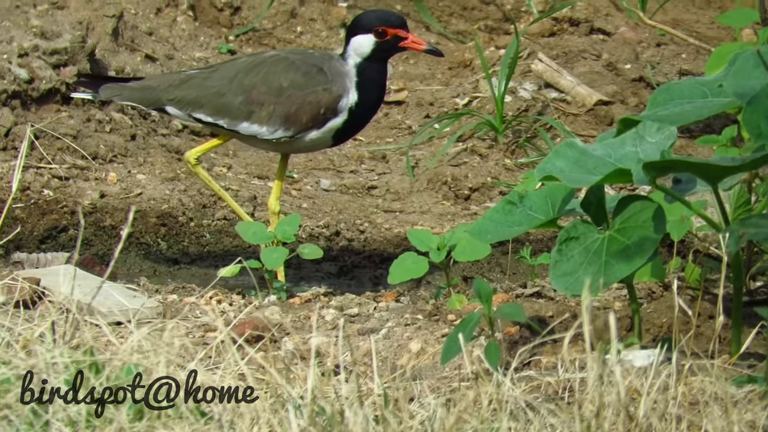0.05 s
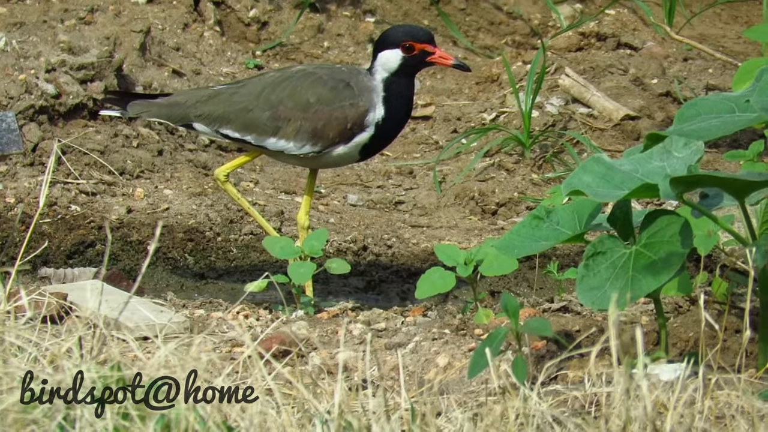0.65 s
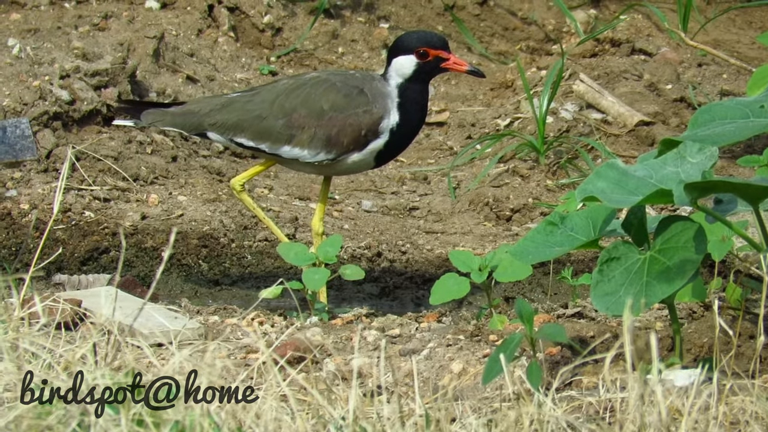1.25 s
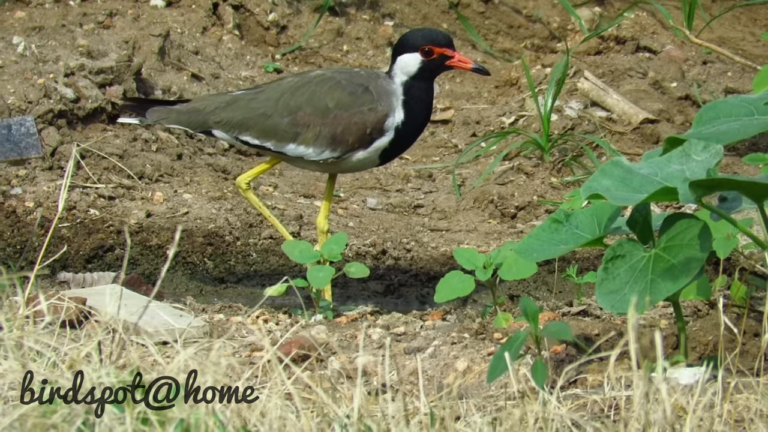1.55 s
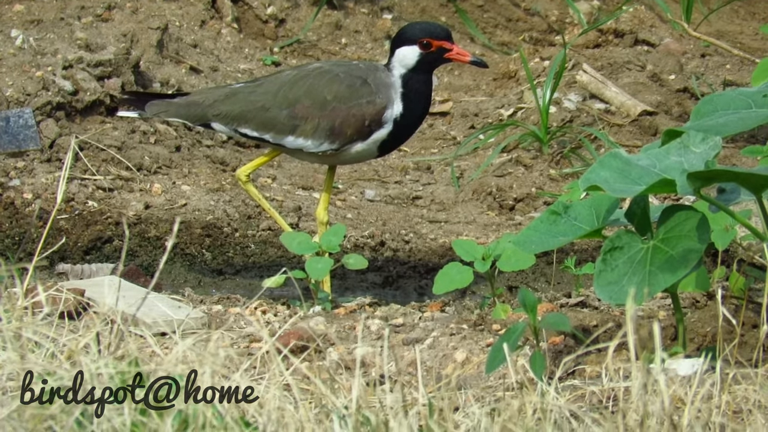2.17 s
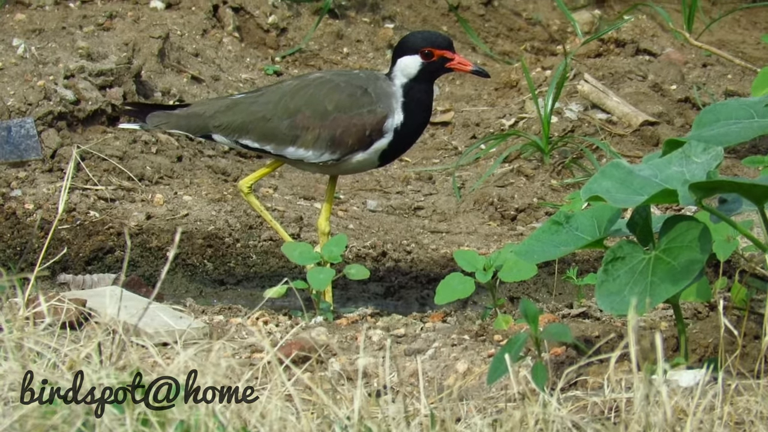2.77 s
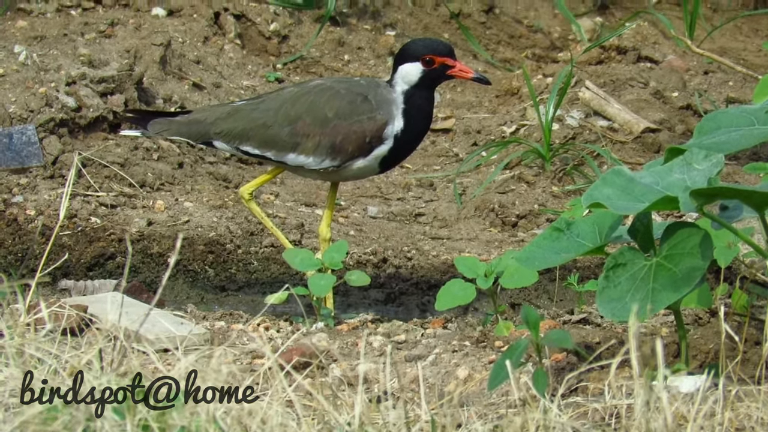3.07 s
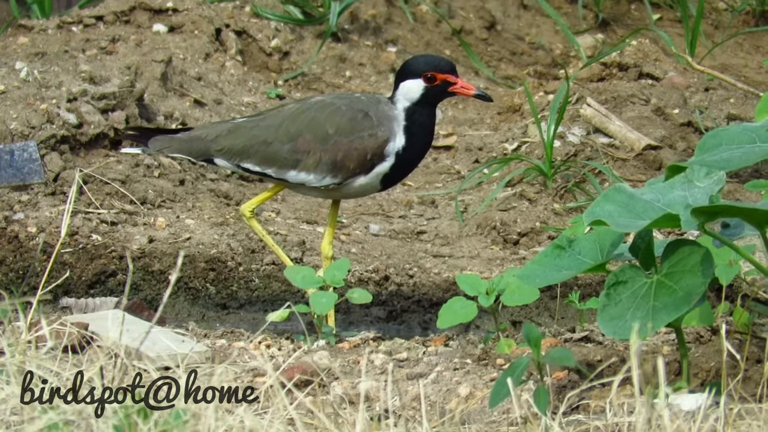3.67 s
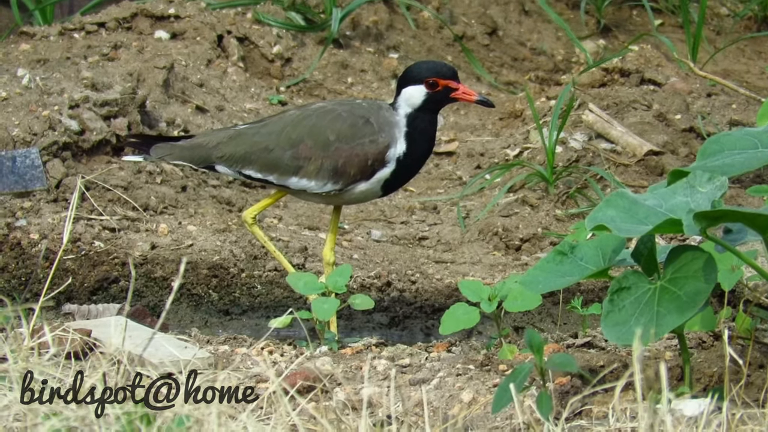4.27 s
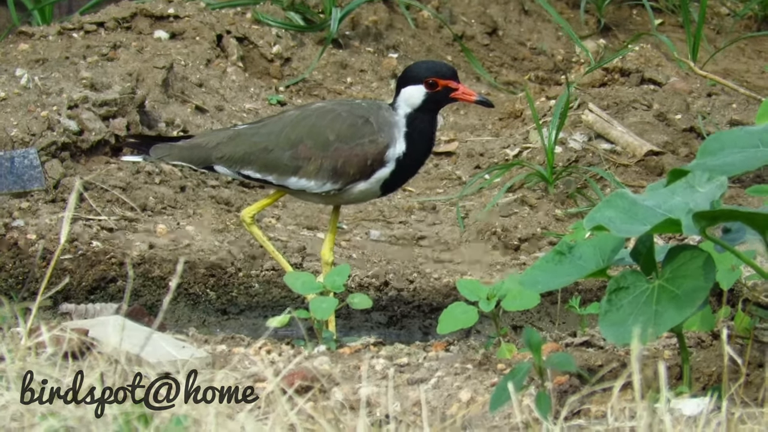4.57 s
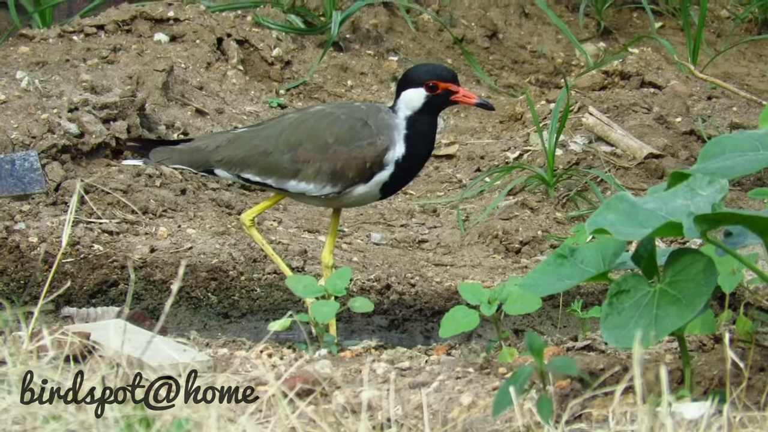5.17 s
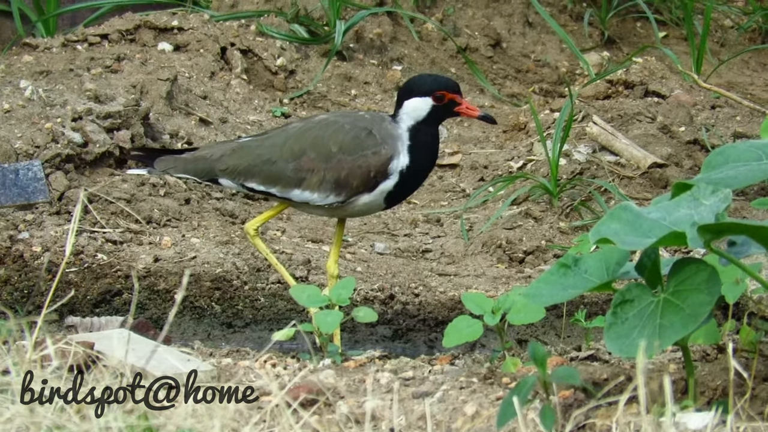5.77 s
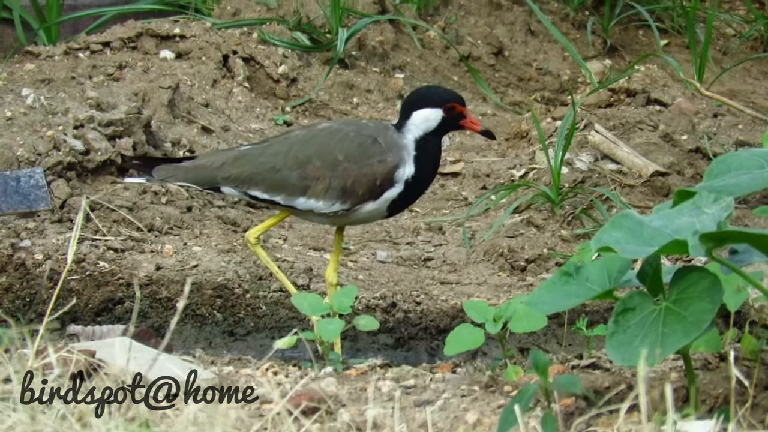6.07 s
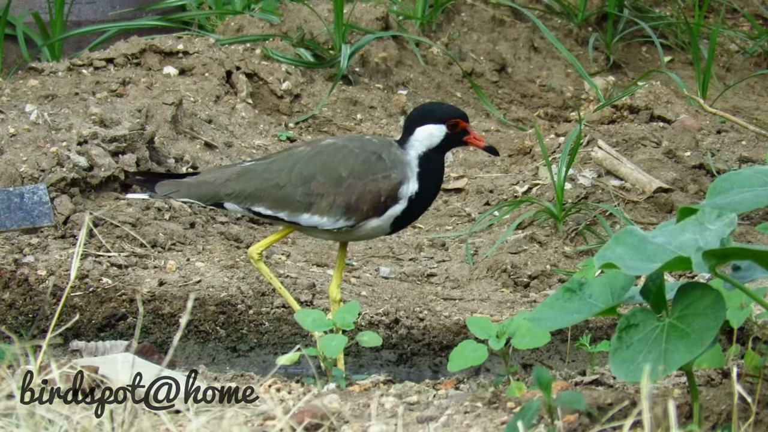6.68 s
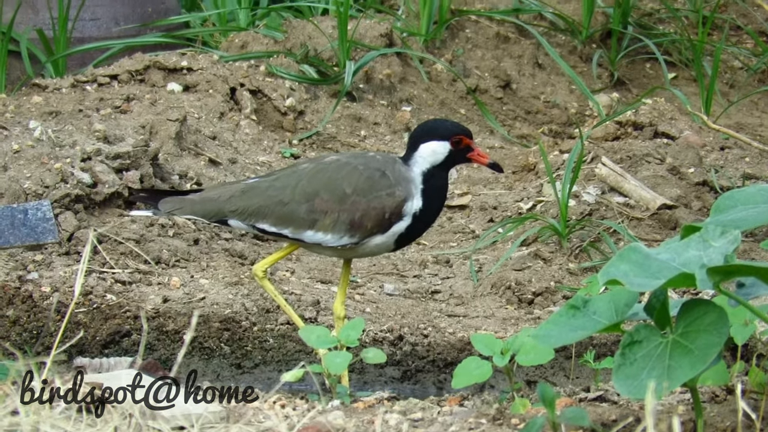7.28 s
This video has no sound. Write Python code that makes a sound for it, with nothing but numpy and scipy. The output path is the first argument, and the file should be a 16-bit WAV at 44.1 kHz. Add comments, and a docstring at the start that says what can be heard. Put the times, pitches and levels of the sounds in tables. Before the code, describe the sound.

A lapwing on open muddy ground gives two bursts of shrill, squeaky calls in the first two seconds, some notes stuttering and flipping upward. Crickets chirp in quick bouts throughout, over a high, shimmering insect chorus. Midway a small bird whistles a short falling phrase and distant crows caw three times, then faint piping notes follow. One microphone catches it all, with a thin echo, a low rumble and soft hiss.

```python
"""A lapwing on open mud gives two bursts of squeaky calls: its voice box chops most notes into a stutter
before they hold, and some dip and flip upward. Crickets chirp in bouts, two wing strokes a chirp, over
a far insect chorus. Crows caw far off with rattling voices, and small birds whistle and chip.
Trees give a thin echo; a low rumble, a soft hiss and, early on, a far engine lie underneath.
One microphone hears it all."""
import sys
import numpy as np
from scipy import signal
from scipy.fft import rfft, irfft, next_fast_len
from scipy.io import wavfile
from scipy.ndimage import uniform_filter1d, map_coordinates

SR = 44100
rng = np.random.default_rng(int(sys.argv[2]) if len(sys.argv) > 2 else 0)


def log_audio(samples):
    """Write samples as a 16-bit WAV file to the path given in sys.argv[1]."""
    # one column per channel
    frames = np.atleast_2d(samples).T
    # limit to full scale, then quantise
    limited = np.clip(frames, -1, 1)
    pcm = np.round(limited * 32767).astype(np.int16)
    wavfile.write(sys.argv[1], SR, pcm)


N = 323253
TIME = np.arange(N) / SR

# Bouts (runs) of cricket chirps. Each row: first chirp in seconds, last chirp in seconds,
# slowing in seconds per chirp squared, base level in dB.
BOUTS = [(.011, .109, 0, -31.5), (.597, .866, .001, -32.5), (.933, 1.223, .0028, -31),
         (1.697, 2.441, .0007, -30.5), (2.914, 3.694, .0008, -32.5), (3.946, 4.632, .0015, -31.5),
         (5.059, 5.337, .002, -32), (5.453, 5.91, .0018, -31.5), (6.178, 6.865, .0022, -31.5)]


def lapwing(stutter_db=0.9, thump_db=-34, rasp_db=-48, echo_db=-27, echo_s=0.1):
    """Squeaks chopped by the bird's voice box, with a rasp and a pop in each burst and a faint echo."""
    stuttering, bursts, thumps = lapwing_stutter()
    gate = 1 - stuttering + stuttering * from_db(stutter_db) * bursts
    voice = lapwing_voice(stuttering)
    rasp_colour = [(300, 9), (1200, 25), (2500, 5), (3800, 15), (6000, -15), (15000, -19)]
    call = voice * gate + from_db(rasp_db) * bursts * noise(rasp_colour)
    echo = from_db(echo_db) * np.interp(TIME - echo_s, TIME, call, left=0)
    return outdoors(call + echo, wet_db=-21.5, t60=0.14) + from_db(thump_db) * thumps


def lapwing_stutter(first_burst_s=0.0058, growth_s=0.0008, shut_s=0.0017, thump_s=0.00058):
    """The voice box opens in quick bursts, each longer than the last and each starting with a dull pop."""
    # Each row: start in seconds, seconds between bursts, time in seconds from which the voice holds.
    stutters = [(.243, .0131, .322), (1.0494, .015, 1.0807), (1.172, .0139, 1.258), (1.521, .0131, 1.6006)]
    stuttering, bursts, thumps = np.zeros((3, N))
    t = np.arange(SR // 30) / SR
    for start, period, holds in stutters:
        stuttering[(TIME > start - period / 2) & (TIME < holds)] = 1
        for k in range(round((holds - start) / period)):
            opens, open_s = start + k * period, first_burst_s + k * growth_s
            rise = 1 - np.exp(-t / 0.0001)
            add(bursts, opens, rise * np.exp(-np.maximum(t - open_s, 0) / shut_s))
            age = t / (thump_s * rng.uniform(0.38, 2.0))
            add(thumps, opens + rng.uniform(0, 0.0021), age * (3 - age) * np.exp(-age))
    return uniform_filter1d(stuttering, size=60), bursts, thumps


def lapwing_voice(stuttering, jitter=0.0019, rough_jitter=0.034, rough_db=2.0):
    """A pressed voice, rich in overtones, rings in the throat; roughness shakes its pitch and level."""
    # How the throat colours the voice. Each row: frequency in Hz, gain in dB.
    throat = [(1000, -25), (1230, -19), (1550, -10.5), (2000, -4.5), (2450, -3), (3100, -9), (3700, -12.7),
              (4850, -19.5), (6100, -30), (7300, -32), (8600, -41), (9900, -41), (11200, -36),
              (12500, -32.5), (14000, -33.5), (15500, -38)]
    # The squeaks, one list a note. Each row: time in seconds, pitch in Hz.
    squeaks = [
        [(0, 1225), (.07, 1205), (.115, 1202), (.131, 1132)],
        [(.243, 1148), (.258, 1182), (.285, 1229), (.322, 1160), (.345, 1100), (.358, 1023), (.376, 966)],
        [(1.05, 1199), (1.068, 1203), (1.09, 1245), (1.102, 1140)],
        [(1.172, 1207), (1.2, 1251), (1.245, 1262), (1.325, 1249), (1.407, 1212), (1.419, 1130)],
        [(1.521, 1184), (1.545, 1229), (1.603, 1194), (1.624, 1113), (1.64, 1040), (1.655, 980)],
    ]
    # The upward flips after a deep slide, laid out like the squeaks.
    flips = [
        [(.379, 1226), (.395, 1303), (.408, 1427), (.419, 1643), (.436, 1466)],
        [(1.657, 1275), (1.672, 1280), (1.69, 1364), (1.703, 1650), (1.722, 1530)],
    ]
    # Pitch sets a squeak's tone. Each row: pitch in Hz, level in dB before the throat,
    # overtone brightness in dB per octave, roughness (0 is smooth).
    squeak_tone = [(1030, -38, -3, .03), (1100, -32.3, -4.5, 0.45), (1235, -31.5, -0.4, 0.05),
                   (1310, -30.7, -0.5, .03)]
    # The same columns for the flips, where the voice breaks at the top.
    flip_tone = [(1230, -36, -15, .4), (1320, -32.5, -10, .08), (1420, -28.5, -4, 0.29),
                 (1530, -31, -2.5, 0.51), (1585, -34.5, -3.5, 1.6)]
    notes = [lapwing_note(pitches, squeak_tone) for pitches in squeaks]
    notes += [lapwing_note(pitches, flip_tone) for pitches in flips]
    out = np.zeros(N)
    for t, hz, gain, bright_db, rough in notes:
        strain = np.interp(t, TIME, stuttering)   # stuttering makes the voice brighter and rougher
        bright_db, rough = bright_db + 0.2 * strain, rough + 0.51 * strain
        hz = hz * (1 + (jitter + rough_jitter * rough) * drift(906, len(hz)))
        phase = cycle(hz)
        voice = np.zeros(len(hz))
        for k in range(1, 14):
            tilt = from_db(bright_db * np.log2(max(k, 2) - 1))
            voice += gain_at(throat, k * hz) * (k * hz < SR / 2) * tilt * np.sin(k * phase)
        shake = from_db((0.1 + rough_db * rough) * drift(669, len(hz)))
        add(out, t[0], gain * voice * shake)
    return out


def lapwing_note(pitches, tone, release_s=0.0069, release_db=11):
    """Times, pitch, gain, brightness and roughness along one note, which fades as it ends."""
    hz, gain = contour([(s, hz, 0) for s, hz in pitches])
    t = pitches[0][0] + np.arange(len(hz)) / SR
    at_hz, *columns = np.transpose(tone)
    db, bright_db, rough = (np.interp(hz, at_hz, column) for column in columns)
    release = np.clip(1 - (t[-1] - t) / release_s, 0, 1)
    return t, hz, gain * from_db(db - release_db * release), bright_db, rough


def near_crickets(pitch_hz=5552, width_s=0.004, stroke_gap_s=0.0225, overtone_db=-36):
    """Two wing strokes a chirp; each swells and fades on the one pitch at which the wing rings."""
    out = np.zeros(N)
    t = np.arange(-SR // 80, SR // 80) / SR
    swell = np.exp(-0.5 * (t / width_s) ** 2)
    for s, db in chirps():
        for at in (s, s + stroke_gap_s):
            hz = pitch_hz + rng.normal(0, 15.8) - 1500 * t   # sinks a little during the stroke
            phase = cycle(hz) + rng.uniform(0, 2 * np.pi)
            stroke = np.sin(phase) + from_db(overtone_db) * np.sin(2 * phase)
            add(out, at + t[0], from_db(db + rng.normal(-0.5, 1.4)) * swell * stroke)
    return outdoors(out, wet_db=-11.5, t60=0.15)


def chirps(spacing_s=0.095, swell_db=3, strays_per_s=2.2, stray_db=-3.5):
    """Time and level of every chirp: a bout slows down as it goes and is loudest in the middle."""
    for first, last, slowing, db in BOUTS:
        steps = max(round((last - first) / spacing_s), 1)
        for k in range(steps + 1):
            s = first + (last - first) * k / steps - slowing * k * (steps - k)
            swell = np.sin(np.pi * (k + 1) / (steps + 2)) - 1
            yield s, db + swell_db * swell
            chance, offset = rng.random(2)
            if chance < strays_per_s * spacing_s and k < steps:   # a neighbour chirps in between
                yield s + spacing_s * (1 + offset) / 3, db + stray_db


def far_crickets(level_db=-48.5, flicker_db=3, early_s=0.1, late_s=0.12, fade_s=0.04):
    """A blur of farther crickets that joins just before each near bout and stops just after it."""
    # Their colour. Each row: frequency in Hz, gain in dB.
    colour = [(4900, -33.5), (5350, -13), (5540, 3), (5680, -14), (6000, -30), (10300, -55), (10900, -32),
              (11150, -29), (11600, -54)]
    inside_s = [np.minimum(TIME - first + early_s, last + late_s - TIME) for first, last, *_ in BOUTS]
    joined = np.clip(np.max(inside_s, axis=0) / fade_s + 0.5, 0, 1)
    return joined * from_db(level_db + flicker_db * drift(80)) * noise(colour)


def crows(rough=0.77, jitter=0.018, rattle_hz=130, flutter=0.0708, fundamental_db=2):
    """Harsh caws that swell, arch and fall: an uneven rattle throws side tones around each overtone."""
    # Each row: start in seconds, length in seconds, top pitch in Hz, base level in dB,
    # beak opening in dB (higher gives stronger overtones).
    caws = [(-.05, 0.22, 771, -66, -48), (0.66, 0.19, 763, -68.5, -52), (1.267, 0.25, 754, -66, -25),
            (1.842, 0.34, 827, -62, -20), (2.449, 0.43, 742, -68, -33), (3.863, 0.37, 690.7, -48, -4.5),
            (4.45, 0.37, 667.3, -50.5, -2.5), (5.289, .39, 677, -47, -5),
            (7.087, 0.26, 683.5, -58.5, -19.5)]
    # How the throat colours a caw. Each row: frequency in Hz, gain in dB.
    throat = [(350, 5), (620, -18), (900, -20), (1100, -15.5), (1330, 2.5), (1600, 4), (1950, -5.5),
              (2250, -17), (3500, -47), (6000, -50)]
    # A caw's shape. Each row: share of its length, share of its top pitch, level change in dB.
    arch = [(0, .9, -22), (.1674, .98, -3), (.42, 1, 1), (.65, .92, -1), (.85, .81, -4), (1, .72, -9)]
    out = np.zeros(N)
    for s, length, pitch, db, beak_db in caws:
        hz, gain = contour([(s + part * length, bend * pitch, change) for part, bend, change in arch])
        size = len(hz)
        phase = cycle(hz * (1 + jitter * drift(500, size)))
        rattle_phase = cycle(rattle_hz * (1 + 0.21 * drift(60.7, size)))
        rattle = 1 + rough * (np.sqrt(2) * np.sin(rattle_phase) + drift(700, size))
        # the lowest tone flutters and is strongest in mid-call
        swell = from_db(fundamental_db) * np.sin(np.linspace(0, np.pi, size))
        fundamental = swell * np.sin(cycle(hz * (0.97 + flutter * drift(199.6, size))))
        overtones = sum(np.sin(k * phase) for k in range(2, 7))
        voice = rattle * from_db(beak_db) * overtones + fundamental
        caw = irfft(rfft(voice) * gain_at(throat, np.arange(size // 2 + 1) * SR / size), size)
        add(out, s, from_db(db) * gain * rms_one(caw))
    return outdoors(outdoors(out, wet_db=-6, t60=0.26), wet_db=-13.5, t60=2.63)


def songbirds():
    """One bird whistles nearby; farther ones pipe, chip and whistle, and one hoots once."""
    # The near whistler, one list a note. Each row: time in seconds, pitch in Hz, base level in dB.
    whistles = [
        [(3.615, 6050, -52), (3.655, 6050, -40.5), (3.7, 5450, -34.5), (3.745, 4610, -36), (3.785, 3820, -40),
         (3.8, 3400, -59)],
        [(3.885, 6400, -47), (3.905, 5100, -35.5), (3.92, 4350, -43), (3.938, 3990, -39)],
        [(3.94, 3350, -49), (3.953, 4150, -40.5), (3.97, 4380, -38), (3.987, 3750, -48)],
        [(4.012, 3280, -49), (4.027, 4040, -41), (4.04, 4160, -35.5), (4.05, 3870, -66)],
        [(4.125, 4700, -40), (4.15, 5600, -35), (4.168, 5890, -36), (4.195, 5250, -37), (4.225, 4070, -38.5),
         (4.255, 3440, -44), (4.28, 2970, -56)],
    ]
    # A piping bird. Each row: start in seconds, length in seconds, pitch in Hz, base level in dB.
    pip_notes = [(6.059, 0.042, 2794, -48), (6.349, 0.059, 2756, -47), (6.645, 0.059, 2763, -45.5),
                 (6.924, 0.088, 2793, -46), (7.197, 0.046, 2734, -45)]
    # Faint whistles that sink a little. Each row: start in seconds, length in seconds, base level in dB.
    faint_notes = [(-.05, 0.258, -44.5), (3.377, 0.297, -61)]
    # One far hoot. Each row: time in seconds, pitch in Hz, level in dB.
    hoot_note = [(2.57, 544, -68), (2.595, 575, -49), (2.615, 563, -51), (2.645, 548, -57)]
    # Runs of rising notes, falling slurs and sharp chips. Each row: first and last note in seconds,
    # rough spacing in seconds, first and last base level in dB.
    riser_runs = [(1.975, 3.535, .26, -57.5, -52)]
    slur_runs = [(3.845, 5.0, .231, -50, -55)]
    chip_runs = [(2.15, 3.453, .26, -62, -56), (6.152, 7.221, .267, -60, -53.5)]
    risers = [[(s, 2180, db - 5.5), (s + 0.0418, 2350, db), (s + 0.076, 2420, db - 19)]
              for s, db in repeated(riser_runs)]
    slurs = [[(s - 0.015, 3120, db - 4), (s, 3110, db - 3),
              (s + 0.0172, 3000, db), (s + 0.024, 2550, db - 8)] for s, db in repeated(slur_runs)]
    chips = [[(s, 5300, db), (s + 0.013, 3900, db), (s + 0.023, 2700, db + 3)]
             for s, db in repeated(chip_runs)]
    pips = [[(s, hz + 20, db - 0.5), (s + length / 2, hz, db), (s + length, hz - 20, db + 0.5)]
            for s, length, hz, db in pip_notes]
    faint = [[(s, 2080, db - 1), (s + length / 3, 2030, db), (s + length, 2000, db - 15.5)]
             for s, length, db in faint_notes]
    near = from_db(-2.5) * outdoors(tones(whistles, waver=0.011), wet_db=-7.5, t60=0.47)
    piping = from_db(-0.5) * outdoors(tones(pips, waver=0.009), wet_db=-7.5, t60=0.96)
    far = from_db(-4) * outdoors(tones(risers + slurs + faint, waver=0.014), wet_db=-4, t60=0.86)
    chipping = from_db(-1) * outdoors(tones(chips, waver=0.028), wet_db=-1, t60=0.37)
    hoot = outdoors(tones([hoot_note], waver=0.012), wet_db=-11.5, t60=0.68)
    return near + piping + far + chipping + hoot


def insect_chorus():
    """Many far insects blur into one high, shimmering noise."""
    # Each row: time in seconds, level in dB.
    levels = [(0, -45.5), (.4, -50), (.95, -47), (1.6, -50), (3.1, -48), (4.3, -46.5), (4.75, -51.5),
              (5.5, -46), (6, -52.5), (6.7, -48), (7.33, -48.5)]
    # Each row: frequency in Hz, gain in dB.
    colour = [(3000, -57), (3900, -22), (4600, -15.5), (5000, -7), (5380, -0.5), (5600, -1.5), (5850, -14),
              (6250, -13), (6550, -11.5), (6900, -16.5), (7150, -31), (8600, -39), (9500, -44.5)]
    return from_db(in_time(levels) + 0.6 * drift(9) + 1.47 * drift(70)) * noise(colour)


def rumble():
    """A low, wavering noise, loudest at the start."""
    # Each row: time in seconds, base level in dB.
    levels = [(0, -52), (.6, -56), (1.3, -55.5), (1.7, -62), (3.1, -62.5), (4.15, -63.5), (4.5, -63),
              (7.33, -63)]
    # Each row: frequency in Hz, gain in dB.
    colour = [(15, -42), (25, -38), (49, -2), (109, 1), (154, -5), (286, -5.5), (399, -10), (632, -14),
              (684, -17), (881, -19), (1100, -22.5), (1430, -16), (2420, -120)]
    return from_db(in_time(levels) + 0.5 + 1.7 * drift(15)) * noise(colour)


def far_wash():
    """A flickering wash of noise swells around the lapwing's calls, then settles to faint far birds."""
    # Each row: time in seconds, base level in dB.
    wash_levels = [(0, -67), (.4, -51), (.8, -60.5), (1.2, -51.5), (1.801, -60.5), (3.4, -62.5),
                   (4.2, -58.5), (7.33, -64)]
    twitter_levels = [(3.85, -72.5), (5.15, -68), (5.8, -55.5), (6.05, -59), (6.3, -54.5), (7.33, -53.5)]
    # Each row: frequency in Hz, gain in dB.
    wash_colour = [(900, -10.5), (1350, -1), (1750, 1.5), (2300, 0.5), (2800, 2), (3250, -1.5), (4100, 4),
                   (5200, -2.5), (7000, -16.5)]
    twitter_colour = [(1750, -9), (2000, -3), (2150, 1), (2400, -1.5), (2600, -8), (2900, -10)]
    wash = from_db(in_time(wash_levels) - 0.5 + 3.2 * drift(24)) * noise(wash_colour)
    twitter = from_db(in_time(twitter_levels) + 2.16 * drift(25)) * noise(twitter_colour)
    return wash + twitter


def hiss():
    """A faint, bright noise that rises and falls."""
    # Each row: time in seconds, base level in dB.
    levels = [(0, -67), (.16, -59), (.4, -85), (.56, -66.5), (.9, -69), (1.04, -60.5), (1.3, -67),
              (3.301, -67), (3.95, -70.5), (4.18, -64), (4.8, -71), (5.029, -63), (5.251, -66.5),
              (5.7, -63.5), (7.33, -67)]
    # Each row: frequency in Hz, gain in dB.
    colour = [(900, -9.5), (4000, -1.5), (7500, 3), (8600, 3), (9400, -6.5), (10400, -3.5), (11100, -0.5),
              (11700, -1.5), (12500, -1), (14000, -6), (16000, -6.5)]
    return from_db(in_time(levels) + 3 + 1.1 * drift(23)) * noise(colour)


def rustle(level_db=-53, ends_s=1.84, fade_s=0.33):
    """A high, soft rustle that fades out early on."""
    # Each row: frequency in Hz, gain in dB.
    colour = [(2000, -10), (2800, 1), (3400, -1.5), (4200, -1), (5200, -3.5), (6500, -25)]
    fade = np.clip((ends_s - TIME) / fade_s, 0, 1)
    return from_db(level_db + drift(24)) * fade * noise(colour)


def far_engine():
    """A far engine drones on one low, unsteady tone and dies away."""
    # Each row: time in seconds, pitch in Hz, level in dB.
    drone = [(0, 97.3, -50.5), (.45, 105, -51.5), (.6, 108.5, -65), (.9, 112, -56), (1.5, 107, -58.5),
             (1.7, 107.2, -72)]
    return tones([drone], waver=0.099)


def outdoors(x, wet_db, t60):
    """Trees and banks scatter a sound into a thin tail that falls by 60 dB in t60 seconds."""
    t = np.arange(SR) / SR
    tail = rng.standard_normal(SR) * from_db(-60 * t / t60) * (1 - np.exp(-t / 0.0077))
    tail = signal.sosfilt(signal.butter(2, 7000, fs=SR, output="sos"), tail)
    return x + from_db(wet_db) * signal.fftconvolve(x, tail / np.sqrt(np.sum(tail ** 2)))[:N]


def tones(notes, waver):
    """Nearly pure tones, one a note, whose pitch wavers by chance."""
    out = np.zeros(N)
    for note in notes:
        hz, gain = contour(note)
        add(out, note[0][0], gain * np.sin(cycle(hz * (1 + waver * drift(400, len(hz))))))
    return out


def repeated(runs):
    """Time and level of every note in evenly paced runs."""
    for first, last, period, first_db, last_db in runs:
        count = round((last - first) / period) + 1
        yield from np.linspace((first, first_db), (last, last_db), count)


def contour(rows):
    """Pitch and gain along one note, with softened ends, from rows of seconds, Hz and dB."""
    s, hz, db = np.transpose(rows)
    t = np.arange(s.min(), s.max() + 0.001, 1 / SR)
    edge = np.clip(np.minimum(t - t[0], t[-1] - t) / 0.001, 0, 1)
    pitch = uniform_filter1d(np.interp(t, s, hz), size=200)
    return pitch, np.sqrt(2) * from_db(np.interp(t, s, db)) * edge


def noise(colour):
    """Steady noise of a given colour at unit strength, fading beyond the table's frequencies."""
    size = next_fast_len(N)
    hz = np.arange(size // 2 + 1) * SR / size
    skirts = np.minimum(hz / colour[0][0], 1) ** 2 / np.maximum(hz / colour[-1][0], 1) ** 2
    return rms_one(irfft(rfft(rng.standard_normal(size)) * gain_at(colour, hz) * skirts, size)[:N])


def drift(rate, size=N):
    """A smooth random wobble, about 1 in size, through `rate` random points a second."""
    at = np.arange(size) * rate / SR
    return map_coordinates(rng.standard_normal(int(at[-1]) + 2), [at], order=2, mode="nearest")


def gain_at(colour, hz):
    """Gain at any frequency, from rows of Hz and dB joined on an octave scale."""
    f, db = np.transpose(colour)
    return from_db(np.interp(np.log(hz + 1e-3), np.log(f), db))


def in_time(levels):
    """The level at every sample, from rows of seconds and dB."""
    return np.interp(TIME, *np.transpose(levels))


def cycle(hz):
    """Running phase of a pitch curve."""
    return 2 * np.pi * np.cumsum(hz) / SR


def from_db(db):
    """Decibels to gain."""
    return 10 ** (np.asarray(db) / 20)


def rms_one(x):
    """Scale a sound to an average strength (rms) of 1."""
    return x / np.sqrt(np.mean(x ** 2) + 1e-20)


def add(out, start, sound):
    """Mix a sound in at a time in seconds."""
    i = int(round(start * SR))
    sound = sound[max(-i, 0):max(N - i, 0)]
    out[max(i, 0):max(i, 0) + len(sound)] += sound


def scene():
    """All sources at one microphone, alike in both channels."""
    mono = lapwing() + near_crickets() + far_crickets() + crows() + songbirds()
    mono += insect_chorus() + rumble() + far_wash() + hiss() + rustle() + far_engine()
    return np.array([mono, mono])


def record(dry):
    """The highest treble is cut steeply."""
    cutoff_hz = 15800
    return signal.sosfilt(signal.ellip(10, 0.1, 70, cutoff_hz, fs=SR, output="sos"), dry)


dry = scene()
out = record(dry)
log_audio(out)
```